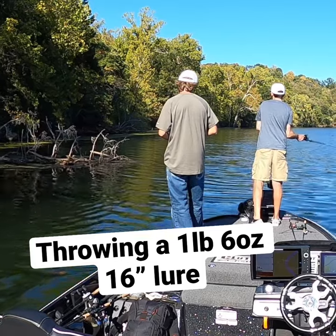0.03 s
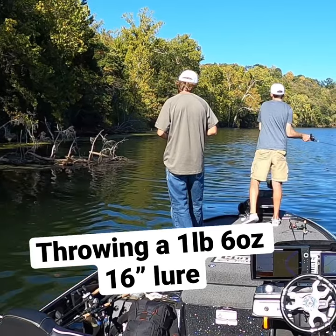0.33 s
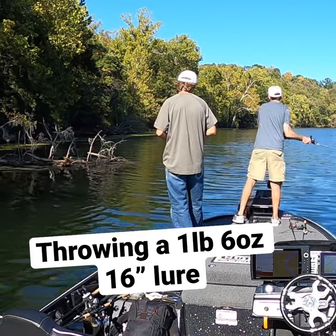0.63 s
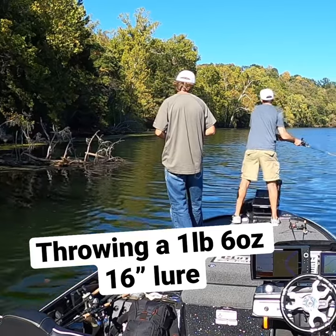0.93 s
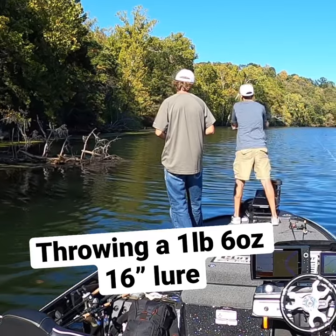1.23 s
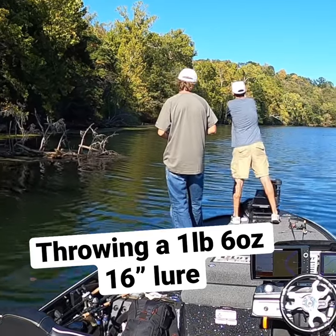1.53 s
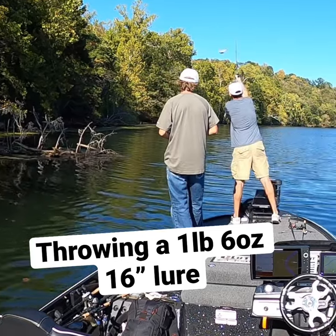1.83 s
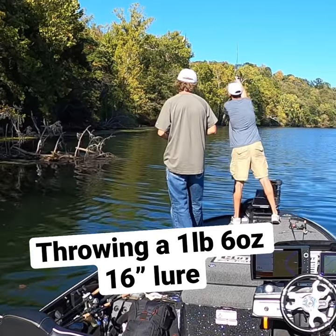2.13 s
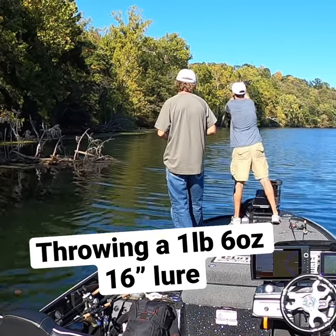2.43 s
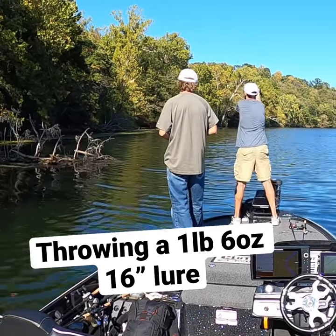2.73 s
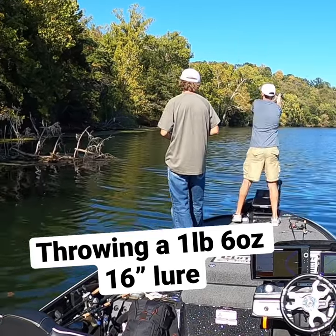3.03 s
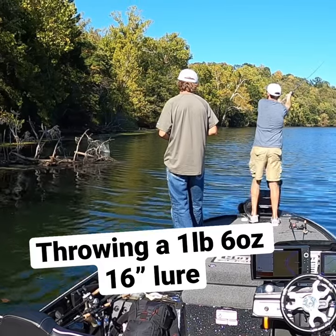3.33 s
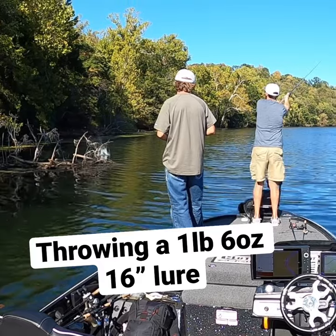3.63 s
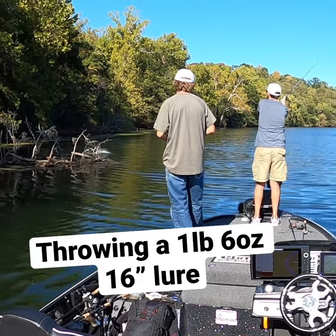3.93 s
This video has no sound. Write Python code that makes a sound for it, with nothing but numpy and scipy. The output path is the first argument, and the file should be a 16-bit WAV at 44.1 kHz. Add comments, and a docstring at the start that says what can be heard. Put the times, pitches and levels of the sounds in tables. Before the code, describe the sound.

A heavy lure lands in a lake with a slap, a hollow gulp and pattering drops. It follows a faint rod swish and reel hiss on a boat, while low, gusty wind rumbles on the microphone throughout.

```python
"""A heavy lure, cast from a boat, slaps a lake beside dead branches. The air pocket behind it
collapses in two gulps, the spray rains back as tiny ringing bubbles, and the bank echoes faintly.
Before the splash the rod swishes and line hisses off the reel. Throughout, gusts buffet the
microphone, chop glugs and laps at the hull, and tackle ticks over a faint hiss of leaves."""
import sys
import numpy as np
from scipy import signal
from scipy.fft import rfft, irfft
from scipy.io import wavfile
from scipy.ndimage import uniform_filter1d

SR = 44100
rng = np.random.default_rng(int(sys.argv[2]) if len(sys.argv) > 2 else 0)


def store_pcm(level_fs):
    """Save levels as 16-bit WAV."""
    pcm = np.round(np.clip(level_fs, -1, 1) * 32767).astype(np.int16)
    wavfile.write(sys.argv[1], SR, np.atleast_2d(pcm).T)


N = 176400
T = np.arange(N) / SR

# Leaves and far shore. Each row: frequency in Hz, relative density in dB.
SHORE_SPECTRUM = [(200, 2), (450, 5), (700, -3), (1300, 2.5), (2500, 0), (5000, -2), (6200, -5), (7300, -1),
                  (8400, -9), (12500, -11), (14500, -23.5)]
# Wind between gusts. Each row: time in seconds, strength in dB.
BREEZE_CURVE = [(0, -18), (.02, -10.5), (.14, -14), (.5, -13.5), (.72, -15.5), (1.1, -11.5), (1.55, -10),
                (2.0, -13), (2.4, -9), (2.47, -22.5), (2.75, -17.5), (2.97, -18.5), (3.15, -14.5),
                (3.55, -8.5), (3.74, -10), (3.8, -15.5), (4, -22)]
# Each row: centre in seconds, width in seconds, change of the breeze in dB.
BREEZE_LULLS = [(0.167, 0.032, -7), (.46, 0.039, -4.5), (0.732, .04, -5.5), (1.118, 0.034, -4.5),
                (1.296, 0.018, -11), (1.595, 0.018, -7.5), (1.705, 0.023, -4.5), (1.888, 0.039, -4.5),
                (1.98, 0.028, -5), (2.135, 0.017, 1.5), (2.246, 0.016, -11), (2.586, 0.025, -1),
                (2.97, 0.021, -8.5), (3.43, .03, -5)]
# Each row: centre in seconds, width in seconds, strength in dB, left over right in dB.
WIND_GUSTS = [(0.016, 0.032, -12.5, 14.5), (0.237, 0.017, -1.5, 4), (0.313, 0.068, -4.5, 4.5),
              (0.389, 0.026, -3, 12), (0.585, 0.057, -0.5, 3.5), (0.844, 0.13, -8, 2.5),
              (0.934, 0.042, 1, 3), (0.994, 0.032, 0.5, 8.5), (1.204, 0.055, -4, 7), (1.356, 0.016, 0, -4),
              (1.46, 0.045, 1, -1.5), (1.65, 0.032, -6.5, 5), (1.744, 0.02, -0.5, 9),
              (1.785, 0.039, -0.5, 9.5), (1.928, 0.023, -4, 3.5), (2.029, 0.075, -6, 2.5),
              (2.198, 0.071, -6, -0.5), (2.3, 0.02, -3.5, 4.5), (2.381, 0.04, -11, 11),
              (2.879, 0.03, -15.5, 9), (3.074, 0.039, -9.5, 3), (3.329, 0.044, -7, 3.5),
              (3.47, 0.019, -13, 2), (3.612, 0.072, -10.5, 6), (3.93, 0.1, -12.5, 5.5)]
# Wind on the microphone in a full gust. Each row: frequency in Hz, half-octave level in dB.
BUFFET_SPECTRUM = [(20, -26), (40, -27), (60, -23.5), (100, -29), (160, -31.5), (230, -40.5), (320, -55),
                   (450, -67), (640, -73.5), (900, -83.5)]
# Each row: centre in seconds, frequency in Hz, peak in dB, left over right in dB.
EDDY_THUMPS = [(0.386, 180, -25, -2), (0.61, 257, -19.5, -1.5), (0.925, 235, -19.5, -5),
               (0.943, 324, -28, 4), (.96, 140, -16.5, 5), (.979, 188, -20.5, 0), (.987, 180, -19.5, -1),
               (1.002, 160, -21.5, 2), (1.437, 184, -18.5, 0), (1.4515, 172, -20.5, 0),
               (1.4562, 175, -18, -1), (1.468, 171, -15, 3), (1.759, 225, -24.5, 2.5),
               (1.784, 204, -19, -3), (2.182, 156, -21, 2), (2.209, 168, -21, 2), (2.394, 160, -23, 1),
               (3.085, 34.8, -23, 8), (3.255, 27.7, -27, 9), (3.482, 152, -21.5, 0), (3.548, 55, -21, 3),
               (3.662, 124, -24.5, 3.5), (3.844, 27.7, -27.5, 14), (3.924, 30.2, -23.5, 13)]
# Hull laps and handling rustles.
# Each row: centre in seconds, width in seconds, frequency in Hz, bandwidth in octaves, level in dB.
LAPS_AND_RUSTLES = [(0.11, 0.015, 3500, 1.3, -65.5), (0.24, 0.035, 1780, 2.5, -68.5),
                    (0.458, 0.013, 1310, 0.31, -61), (0.568, 0.011, 1210, 0.35, -66),
                    (0.723, 0.012, 1830, 0.52, -64.5), (0.848, 0.018, 1190, 1.4, -64.5),
                    (1.208, 0.027, 970, 1.4, -65.5), (1.265, 0.021, 1770, 2.1, -66.5),
                    (1.529, 0.062, 3170, 1.3, -67.5), (1.627, 0.053, 2870, 0.64, -70.5),
                    (2.615, 0.023, 3270, 0.35, -66), (2.875, 0.078, 365, .45, -63.5),
                    (3.263, 0.049, 2230, 1.7, -68.5)]
# Each row: start in seconds, pitch in Hz, level in dB, T60 in seconds.
HULL_GLUGS = [(.703, 1370, -60, 0.066), (2.843, 580, -64.5, 0.17), (2.882, 260, -47, .08),
              (2.897, 196, -35.5, .13), (3.265, 191, -34.5, 0.098)]
# Tackle and twigs.
# Each row: start in seconds, frequency in Hz, level in dB, T60 in seconds, bandwidth in octaves.
TACKLE_TICKS = [(.125, 5870, -66, 0.064, .06), (.13, 4060, -73, 0.15, 0.037), (.225, 7470, -72, 0.3, .03),
                (0.385, 2200, -58, 0.035, 1.7), (0.721, 4760, -58.5, 0.044, 0.27),
                (0.784, 5370, -63, .05, .1), (1.069, 5040, -51.5, 0.014, 0.65),
                (1.069, 1610, -60, .025, 0.7), (3.256, 1390, -58, 0.1, 0.75),
                (3.52, 7800, -46, 0.011, 0.38), (3.547, 8000, -49, 0.0074, 0.51)]
# Each row: centre in seconds, width in seconds, frequency in Hz, bandwidth in octaves, level in dB.
ROD_SWISH = [(1.7, 0.031, 1050, 0.38, -64), (1.71, 0.024, 444, 0.39, -54)]
# Line leaving the reel. Each row: time in seconds, level in dB.
REEL_CURVE = [(1.55, -80), (1.78, -73.5), (1.87, -64), (2.0, -72), (2.13, -69), (2.3, -79), (2.7, -103),
              (3.3, -100)]
# Each row: frequency in Hz, relative density in dB.
REEL_SPECTRUM = [(800, -3), (1700, 8), (3000, -2.5), (6000, -0.5), (9500, 2), (12000, -8), (15000, -14)]
# Sheet of spray thrown up. Each row: time in seconds, level in dB.
SHEET_CURVE = [(3.369, -62), (3.39, -45.5), (3.415, -55.5), (3.45, -49.5), (3.49, -55), (3.54, -53.5),
               (3.6, -60.5), (3.67, -54.5), (3.8, -53.5), (4, -54.5)]
# Each row: frequency in Hz, relative gain in dB.
SHEET_SPECTRUM = [(300, 8), (800, 2), (2200, 1), (3500, -1.5), (5500, -4.5), (7500, -14), (9500, -20),
                  (14000, -34)]
# Spray falling back. Each row: time in seconds, level in dB.
FALL_CURVE = [(3.6, -68), (3.64, -60), (3.7, -81), (3.76, -49.5), (3.8, -61.5), (3.85, -50.5), (3.92, -54),
              (3.96, -56), (4, -67)]
# Each row: frequency in Hz, relative gain in dB.
FALL_SPECTRUM = [(250, 14.5), (500, 14.5), (900, 4), (1600, 9), (2500, -1), (4000, -16), (7000, -45),
                 (14000, -46)]
# Each row: start in seconds, pitch in Hz, level in dB, T60 in seconds.
LARGE_DROPS = [(3.635, 1580, -47, 0.022), (3.729, 3460, -47.5, 0.027), (3.748, 487, -45.5, 0.042),
               (3.758, 1480, -48, 0.12), (3.774, 1880, -44, 0.047), (3.808, 1480, -47, 0.035),
               (3.839, 1415, -38, 0.027), (3.862, 650, -42, 0.023), (3.956, 1460, -47.5, 0.053),
               (3.964, 2170, -45, 0.024)]
# Air pockets closing. Each row: start in seconds, pitch in Hz, level in dB, T60 in seconds.
CAVITY_GULPS = [(3.3725, 603, -33, 0.0085), (3.385, 540, -33.5, 0.018), (3.392, 660, -32.5, 0.014),
                (3.551, 2215, -27.5, 0.027), (3.551, 2605, -34.5, 0.032), (3.551, 3700, -31, 0.0085),
                (3.553, 990, -25.5, 0.046), (3.553, 1390, -38.5, 0.093), (3.554, 260, -19.5, 0.014),
                (3.570, 2030, -30, 0.044), (3.571, 1044, -26.5, 0.028), (3.572, 1570, -33, 0.041),
                (3.572, 856, -30, 0.044), (3.5735, 301.7, -22, 0.085), (3.58, 433, -31.5, 0.059),
                (3.586, 590, -32, 0.025), (3.596, 170, -26.5, 0.13)]
# Brief, twig-like ringing at the first crack. Each row: frequency in Hz, level in dB, T60 in seconds.
CRACK_RING_MODES = [(2308, -46.5, 0.15), (2690, -47.5, 0.048), (3990, -41, 0.03), (6030, -47, 0.051)]
# Blows on the water. Each row: start in seconds, level in dB, low edge in Hz, high edge in Hz,
# T60 in seconds, left over right in dB.
LURE_SLAPS = [(3.3718, -27, 1000, 5100, 0.013, 4.5), (3.3763, -34.5, 900, 6200, 0.042, -1),
              (3.3852, -42, 400, 3670, 0.072, 4), (3.5518, -31, 1420, 2920, 0.032, 9.5),
              (3.5700, -37, 1000, 2100, 0.028, -11), (3.5719, -26, 546, 2320, 0.034, 3.5),
              (3.586, -34, 450, 1800, 0.027, 0)]

GULP_GLIDE, DROP_GLIDE, BUBBLE_RISE_CYCLES = 0.054, 0.23, 0.31
BUFFET_SHARED_HZ, BRIGHTEN_KNEE_HZ, BRIGHTEN_PER_OCTAVE = 150, 70.6, 0.2
PORT_LAG_S, PORT_LAG_KNEE_HZ = 0.0014, 252
FLUTTER_DB, CLUMP_DB = 1.2, 3.0
SPRAY_START_S, SPRAY_SHARED = SHEET_CURVE[0][0], 0.84
DROPS_PER_S, DROP_T60_CYCLES, DROP_SPREAD_DB = 3600, 14, 3.0


def undb(db):
    """Decibels to gain."""
    return 10 ** (np.asarray(db) / 20)


def unit(x):
    """Scale to rms 1."""
    return x / np.sqrt(np.mean(x ** 2) + 1e-30)


def curve(points):
    """Gain along a (s, dB) curve, silent before it starts."""
    return undb(np.interp(T, *np.array(points).T, left=-200))


def gain_at(spectrum, hz):
    """Gain of a (Hz, dB) spectrum at hz."""
    knots_hz, db = np.array(spectrum).T
    return undb(np.interp(np.log(hz + 1), np.log(knots_hz), db))


def colour(x, spectrum):
    """Filter by a spectrum, to rms 1."""
    return unit(irfft(rfft(x) * gain_at(spectrum, np.arange(N // 2 + 1) * SR / N), N))


def band(x, hz, octaves):
    """Bell-shaped band-pass, to rms 1."""
    offset = np.log2((np.arange(N // 2 + 1) * SR / N + 1) / hz) / octaves
    return unit(irfft(rfft(x) * np.exp(-offset ** 2), N))


def pair(three, shared):
    """Stereo from one common and two separate signals."""
    return np.sqrt(shared) * three[0] + np.sqrt(1 - shared) * three[1:]


def noise(shared):
    """Partly correlated stereo white noise."""
    return pair(rng.standard_normal((3, N)), shared)


def pan(db):
    """Stereo gains, left over right by db."""
    return undb(np.array([[db], [-db]]) / 2)


def swell(centre_s, width_s):
    """Gaussian rise and fall."""
    return np.exp(-2 * np.minimum(((T - centre_s) / width_s) ** 2, 20))


def strike(start_s, rise_s, t60_s):
    """Quick attack, exponential decay."""
    age_s = np.maximum(T - start_s, 0)
    return (1 - np.exp(-age_s / rise_s)) * np.exp(-np.minimum(np.log(1000) * age_s / t60_s, 20))


def add_ring(out, start_s, hz, gain, t60_s, glide):
    """Add a damped sine; positive glide gives a bubble's rising pitch."""
    age_s = np.arange(int(1.3 * t60_s * SR)) / SR
    envelope = (1 - np.exp(-age_s * hz / BUBBLE_RISE_CYCLES)) * np.exp(-np.log(1000) * age_s / t60_s)
    ring = gain * envelope * np.sin(2 * np.pi * hz * age_s * (1 + glide * age_s / t60_s))
    part = out[int(start_s * SR):][:len(ring)]
    part += np.sqrt(2) * ring[:len(part)]


def rings(rows, glide):
    """Sum of ringing bubbles or modes."""
    out = np.zeros(N)
    for start_s, hz, db, t60_s in rows:
        add_ring(out, start_s, hz, undb(db), t60_s, glide)
    return out


def shore():
    """Faint, even hiss of leaves and ripples."""
    return colour(noise(shared=0.077), SHORE_SPECTRUM) * undb(-66.5) * pan(db=3.5)


def port_lag_s(hz):
    """Eddies reach the left microphone port after the right; small, fast ones cross sooner."""
    return PORT_LAG_S / (1 + (hz / PORT_LAG_KNEE_HZ) ** 2)


def wind():
    """Eddies buffet the microphone ports; stronger gusts are louder and brighter."""
    lulls_db = sum(db * swell(at_s, width_s) for at_s, width_s, db in BREEZE_LULLS)
    breeze = curve(BREEZE_CURVE) * undb(lulls_db) * pan(db=3)
    gust_power = sum((undb(db) * swell(at_s, width_s) * pan(side_db)) ** 2
                     for at_s, width_s, db, side_db in WIND_GUSTS)
    force = np.sqrt(breeze ** 2 + gust_power)
    speed = np.sqrt(np.mean(force ** 2, axis=0))
    flutter = undb(FLUTTER_DB * band(rng.standard_normal(N), hz=12.8, octaves=1.0))
    out = 0
    for hz in 20 * 2 ** (np.arange(12) / 2):
        shared = hz ** 2 / (hz ** 2 + BUFFET_SHARED_HZ ** 2)
        left, right = band(noise(shared), hz, octaves=0.32)
        eddies = np.array([np.interp(T - port_lag_s(hz), T, left), right])
        eddies /= np.sqrt(uniform_filter1d(eddies ** 2, size=2400) + 0.1)  # steadies the level
        brightening = speed ** (BRIGHTEN_PER_OCTAVE * max(np.log2(hz / BRIGHTEN_KNEE_HZ), 0))
        out += eddies * gain_at(BUFFET_SPECTRUM, hz) * brightening
    return out * force * flutter


def thumps():
    """A strong eddy hits each port in turn as one dull pressure pulse."""
    out = 0
    for at_s, hz, db, side_db in EDDY_THUMPS:
        lag_s = np.array([[1], [-1]]) * port_lag_s(hz) / 2
        phase_sq = np.minimum((np.pi * hz * (T - at_s - lag_s)) ** 2, 40)
        out += undb(db) * (2 * phase_sq - 1) * np.exp(-phase_sq) * pan(side_db)
    return out


def boat():
    """Laps, rustles and rod swish swell as noise bands; tackle ticks; bubbles glug under the hull."""
    hiss = noise(shared=0.85)
    swells = sum(band(hiss, hz, octaves) * swell(at_s, width_s) * undb(db)
                 for at_s, width_s, hz, octaves, db in LAPS_AND_RUSTLES + ROD_SWISH)
    ticks = sum(band(hiss, hz, octaves) * strike(start_s, 0.00033, t60_s) * undb(db)
                for start_s, hz, db, t60_s, octaves in TACKLE_TICKS)
    return (swells + ticks + rings(HULL_GLUGS, GULP_GLIDE)) * pan(db=0.5)


def reel():
    """Line hisses off the reel."""
    return colour(noise(shared=0.46), REEL_SPECTRUM) * curve(REEL_CURVE)


def bank_echo(x):
    """The wooded bank scatters a faint echo."""
    tail = noise(shared=0.98) * strike(start_s=0.076, rise_s=0.011, t60_s=1)
    return signal.fftconvolve(x, unit(tail) / np.sqrt(N), axes=1)[:, :N] * undb(-24.5)


def patter(low_hz, high_hz):
    """Dense shower of tiny bubbles, random in pitch and level."""
    out = np.zeros(N)
    span_s = N / SR - SPRAY_START_S
    for when, pitch, faintness in rng.random((int(DROPS_PER_S * span_s), 3)):
        hz = low_hz * (high_hz / low_hz) ** np.sqrt(pitch)
        gain = undb(-DROP_SPREAD_DB * np.log(faintness + 0.012)) * hz / high_hz
        add_ring(out, SPRAY_START_S + when * span_s, hz, gain, DROP_T60_CYCLES / hz, DROP_GLIDE)
    return out


def spray(mist_share=0.83):
    """A sheet of mist and droplets flies up; fine drops rain back in clumps, with a few large ones."""
    shower = pair(np.array([patter(low_hz=271, high_hz=12900) for _ in range(3)]), SPRAY_SHARED)
    shower_gain = np.sqrt(1 - SPRAY_START_S * SR / N)  # rms 1 while the shower lasts
    clumps = undb(CLUMP_DB * band(rng.standard_normal(N), hz=60, octaves=1.0))
    mist = np.sqrt(mist_share) * colour(noise(SPRAY_SHARED), SHEET_SPECTRUM)
    droplets = np.sqrt(1 - mist_share) * shower_gain * colour(shower, SHEET_SPECTRUM)
    sheet = (mist + droplets) * curve(SHEET_CURVE)
    fall = shower_gain * colour(shower, FALL_SPECTRUM) * curve(FALL_CURVE) * clumps
    return (rings(LARGE_DROPS, DROP_GLIDE) + sheet + fall) * pan(db=2.5)


def lure_plunge(rise_s=0.0009):
    """The lure cracks on the surface with a twig-like ring; the cavity behind it shuts and gulps."""
    contact_s = LURE_SLAPS[0][0]
    crack_ring = rings([(contact_s, hz, db, t60_s) for hz, db, t60_s in CRACK_RING_MODES], glide=0)
    slaps = 0
    for start_s, db, low_hz, high_hz, t60_s, side_db in LURE_SLAPS:
        slap = noise(shared=0.92) * strike(start_s, rise_s, t60_s)
        slap[:, int((start_s + rise_s) * SR)] -= 3.5  # one-sample click
        slap = signal.sosfilt(signal.butter(1, low_hz, "high", fs=SR, output="sos"), slap)
        slap = signal.sosfilt(signal.butter(3, high_hz, fs=SR, output="sos"), slap)
        makeup_gain = np.sqrt(SR / 2 / (high_hz - low_hz))
        slaps += slap * makeup_gain * undb(db) * pan(side_db)
    return crack_ring + rings(CAVITY_GULPS, GULP_GLIDE) + slaps


def scene():
    """Wind and boat close by, the splash across the water."""
    splash = lure_plunge() + spray()
    return wind() + thumps() + shore() + boat() + reel() + splash + bank_echo(splash)


def record(dry):
    """Steep low-pass at 14750 Hz."""
    return signal.sosfilt(signal.ellip(8, 0.2, 70, 14750, fs=SR, output="sos"), dry)


dry = scene()
out = record(dry)
store_pcm(out)
```